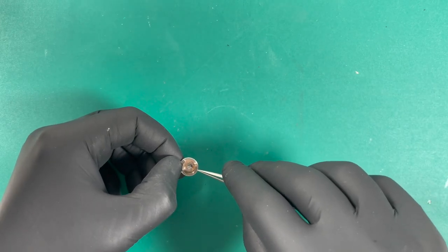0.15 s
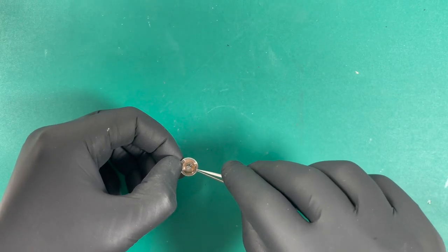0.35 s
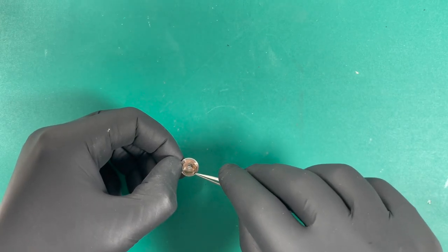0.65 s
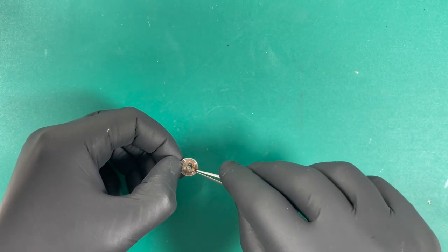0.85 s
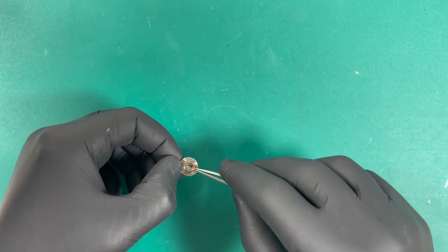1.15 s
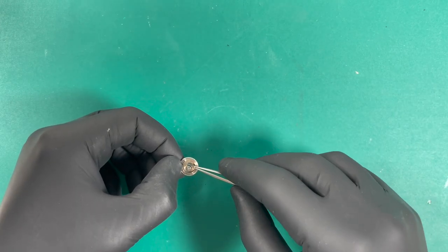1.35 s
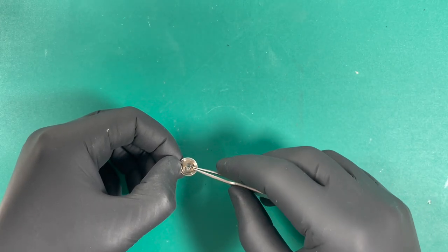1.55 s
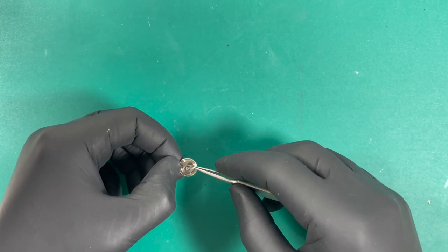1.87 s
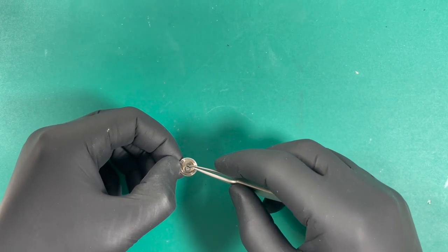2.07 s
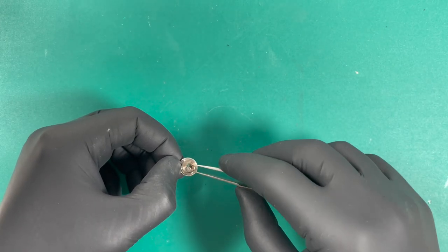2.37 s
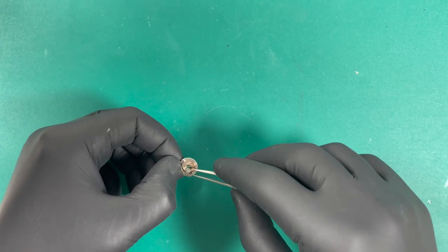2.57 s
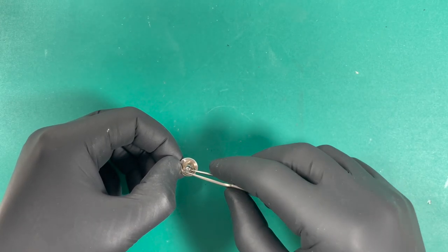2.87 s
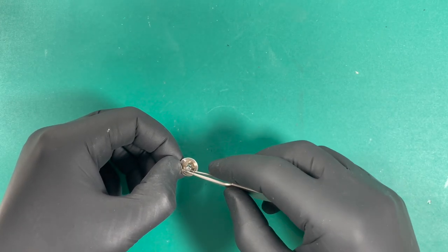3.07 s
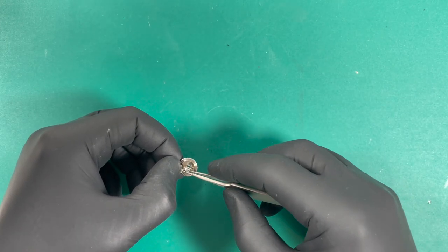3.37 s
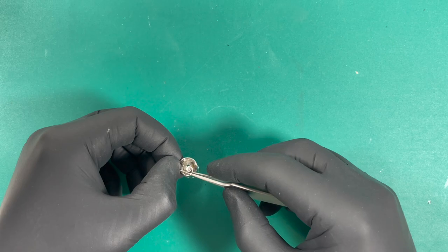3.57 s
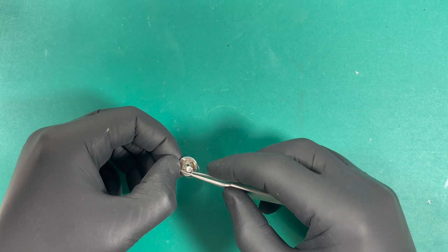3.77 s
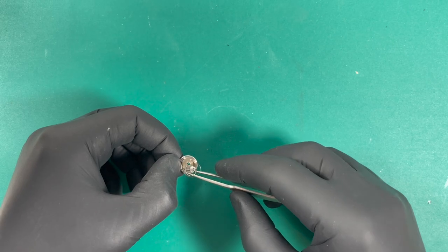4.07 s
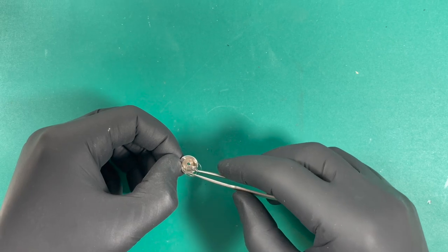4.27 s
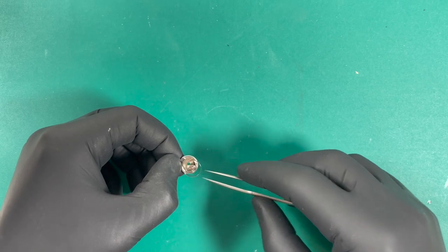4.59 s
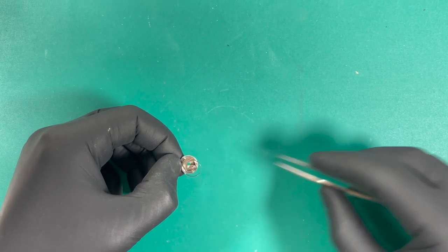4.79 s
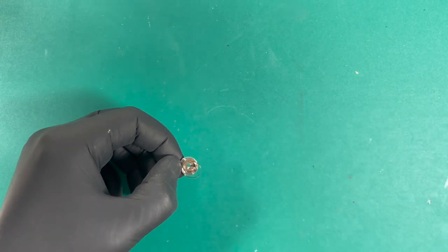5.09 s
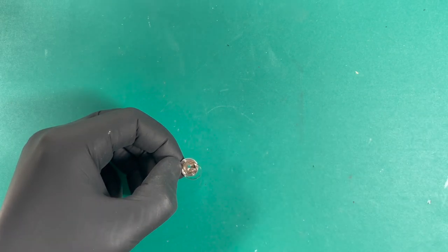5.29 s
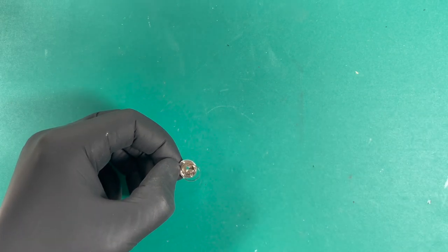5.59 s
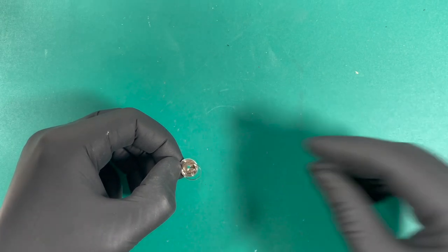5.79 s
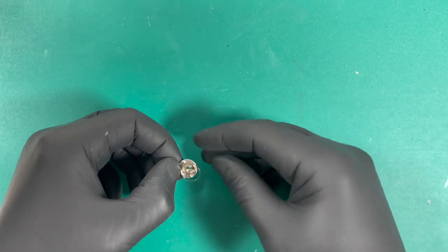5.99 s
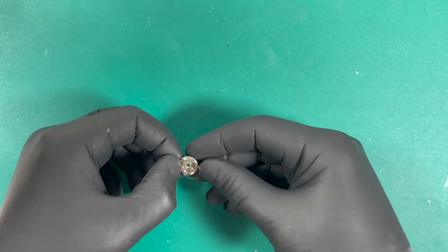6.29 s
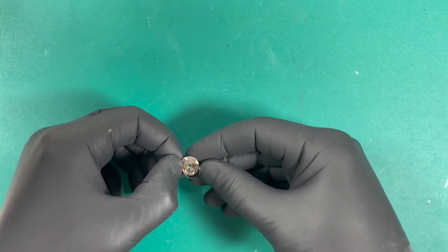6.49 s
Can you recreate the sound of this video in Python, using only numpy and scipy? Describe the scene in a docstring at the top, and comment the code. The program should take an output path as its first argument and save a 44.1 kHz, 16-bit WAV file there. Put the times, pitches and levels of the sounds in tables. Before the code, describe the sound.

In a quiet indoor room with low ventilation rumble and hum, steel tweezer tips tick and scratch on a tiny metal part close to the microphone. The bright clicks are small and irregular, with two sharper slips and faint squeaks between. Then the tweezers drop on the bench to one side, far louder, bounce and rattle briefly. A glove returns with a faint rustle, a dull tap and a tiny squeak.

```python
"""Tweezers on a tiny metal part

Steel tweezers tick and scrape on a part held over a workbench, then drop on the bench to one side and rattle;
a glove comes back with a rustle and a dull tap. Contacts ring decaying modes, drags are dense random catches;
squeaks, soft rubs and short noisy rings after two hard slips are noise bands. Rumble, hum and hiss lie beneath.
Two microphone ports hear everything with a phase gap that grows towards the treble."""
import sys
import numpy as np
from scipy import signal
from scipy.fft import rfft, irfft
from scipy.io import wavfile
from scipy.ndimage import uniform_filter1d

SR = 44100
rng = np.random.default_rng(int(sys.argv[2]) if len(sys.argv) > 2 else 0)


def boost(x):
    """Linear amplitude factor 10**(x/20) for a level x in decibels (scalar or array-like)."""
    u = np.asarray(x, float) / 20
    return 10 ** u


def dump_mix(stems):
    """Bounce the given channels to the path in sys.argv[1] as a 16-bit WAV at rate SR."""
    frames = np.atleast_2d(stems).T  # one column per channel
    limited = np.clip(frames, -1, 1)  # hard clip at full scale
    pcm = np.round(limited * 32767).astype(np.int16)
    wavfile.write(sys.argv[1], SR, pcm)


N = 293265

# Ring modes of tips and part. Each row: frequency in Hz, onset level in dB before tilt, t60 in seconds.
TIPS = [(295, -3, .012), (488, -8, 0.0063), (845, -7, .008), (1400, -1, 0.0063), (1850, -15, 0.014),
        (2520, -13.5, 0.013), (3320, -6.5, 0.0063), (4300, -6.5, 0.0055), (5335, -11, 0.015),
        (6330, 2, 0.0043), (7450, -0.5, 0.008), (8640, 12.5, 0.0028), (10500, -19, 0.0061),
        (10700, -3.5, 0.0073), (11570, -4.5, 0.0036), (12340, -4, .005), (13330, 4, 0.0054),
        (14400, -11, 0.0042), (15500, -11.5, 0.0033)]
# Ring modes of the whole tweezers. Each row: frequency in Hz, onset level in dB before tilt, t60 in seconds.
BODY = [(69.8, -3.5, 0.067), (116, -9.5, 0.034), (293.8, -8.5, 0.012), (500, -8.5, 0.009), (800, -6, 0.016),
        (1450, -9.5, 0.03), (1920, -9.5, 0.0061), (2100, -4.5, 0.015), (2420, -9.5, 0.016),
        (2720, -10.5, .015), (3300, -9, 0.016), (4020, -3.5, .01), (5200, 2.5, 0.0077), (5800, -4, .01),
        (6840, -5, 0.013), (7470, -18, 0.17), (8340, 8, .006), (10000, -6.5, 0.0034), (10940, -15.5, 0.13),
        (12480, 2, .004), (14100, -1.5, .004), (14760, -8.5, 0.05)]


def evened(x):
    """Scales to rms 1."""
    return x / np.sqrt(np.mean(x ** 2) + 1e-30)


def read(points, hz):
    """Interpolates (Hz, value) points on a log frequency axis."""
    f, value = np.transpose(points)
    return np.interp(np.log(hz + 1), np.log(f + 1), value)


def add(mix, start_s, sound):
    """Mixes a sound in at a time."""
    part = mix[round(start_s * SR):][:len(sound)]
    part += sound[:len(part)]


def shaped(x, response):
    """Multiplies the spectrum of x by response(hz)."""
    size = x.shape[-1]
    return irfft(rfft(x) * response(np.fft.rfftfreq(size, 1 / SR)), size)


def lean(x, points):
    """Splits a left-minus-right level difference in dB between the two ports."""
    return shaped(x, lambda hz: boost(read(points, hz) * np.array([[.5], [-.5]])))


def modes(table, hz, spread_db=0):
    """Summed response of decaying modes: one complex pole each, its width set by t60."""
    f, db, t60 = np.transpose(table)[:, :, None]
    pole = 1j * (hz - f) + np.log(1000) / (2 * np.pi * t60)
    return (boost(db + spread_db) / pole).sum(0)


def fuzzy(hz, width_hz):
    """Narrow-band noise that follows the curve hz: slow complex noise turns a carrier; rms 1."""
    r = np.exp(-np.pi * width_hz / SR)
    slow = rng.standard_normal(len(hz)) + 1j * rng.standard_normal(len(hz))
    slow = signal.lfilter([1], np.convolve([1, -r], [1, -r]), slow)
    carrier = np.exp(2j * np.pi * np.cumsum(hz) / SR)
    return evened((slow * carrier).real)


def grit(per_s, spread_db):
    """Random small contacts of uneven size and random sign."""
    size = boost(spread_db * np.minimum(rng.exponential(1, N), 4)) * rng.choice([-1, 1], N)
    return size * (rng.random(N) < per_s / SR)


def blow(mix, s, peak_db, chatter_ms, body, tilt, crack_db, vary_db):
    """A short chatter of contacts rings the modes over a flat crack, tilted by where it lands."""
    chance = rng.standard_normal(8192)
    spread_db = vary_db * rng.standard_normal((len(body), 1))
    t = np.arange(8192) / SR
    press = np.exp(-(1000 * t / max(chatter_ms, .3)) ** 2)
    spectrum = rfft(chance * press)
    contacts = press * irfft(spectrum / abs(spectrum))  # hard contacts push all pitches about alike
    ring = shaped(contacts, lambda hz: boost(read(tilt, hz)) * (modes(body, hz, spread_db) + boost(crack_db)))
    loudest = np.sqrt(2 * uniform_filter1d(ring ** 2, 60).max())
    add(mix, s - .0005, boost(peak_db) * ring[:6000] / loudest)


def ticks():
    """The tips slip off edges of the part; each contact leaves one lower ring sounding longer."""
    # Each row: moment in seconds, peak in dB, 6 kHz and 2.8 kHz in dB re the top ring, favoured ring in Hz.
    slips = [(0.3949, -49.5, -13.5, -28, 5500), (0.6549, -56.5, -29, -31, 1940),
             (0.676, -58, -25, -27, 2040), (0.726, -58, -24, -33, 6400), (0.7436, -48.5, -15, -27, 4040),
             (0.791, -38, -22.5, -21, 4300), (1.1075, -49.5, -15, -26, 5110), (1.1947, -58, -42, -19, 1710),
             (1.248, -53.5, -19, -26, 4240), (1.269, -59, -8, -20, 6600), (1.315, -53, -16, -17.5, 3620),
             (1.416, -54, -17, -15, 1690), (1.43, -54.5, -14, -17.5, 2330), (1.5356, -64, -14, -20, 1720),
             (1.6313, -64, -7, -26, 1880), (1.8535, -36, -15.5, -10.5, 7560), (2.085, -53, -30, -20, 2040),
             (2.1026, -55, -15, -7.5, 7340), (2.1834, -59.5, -8, -28, 8000),
             (2.3199, -38.5, -20, -20, 5360), (2.511, -38, -44, -52, 7800), (2.5483, -46, -16, -13.5, 4300),
             (2.664, -57, -18, -21, 6760), (2.7028, -60, -13, -20, 4340), (2.7215, -58.5, -15, -12, 4400),
             (2.8416, -34, -9.5, -16.5, 7300), (2.9114, -58.5, -13, -10, 5870),
             (2.9748, -49, -6.5, -11.5, 6200), (3.091, -50.5, -19.5, -11.5, 6000),
             (3.2073, -50.5, -20.5, -12, 6300), (3.284, -66, -16, -13, 2360),
             (3.4334, -55, -12.5, -9.5, 7400), (3.51, -59.5, -27, -28, 7630), (3.5633, -55, -7, -5, 5900),
             (3.5921, -23, -12.5, -10.5, 7570), (3.5965, -32, -36, -14, 7900), (3.7923, -62, -16, -7, 3350),
             (3.874, -47.5, -17.5, -7.5, 3240), (3.976, -59.5, -16, -15, 6040),
             (4.039, -40, -9, -13.5, 3270), (4.1508, -44.5, -9.5, -10.5, 6100), (4.174, -64, -4, -22, 5800),
             (4.323, -63, -22, -28, 1800), (4.364, -40, -21, -19, 6170), (4.368, -31, -14.5, -18, 7500),
             (4.373, -33.5, -17, -17.5, 1850), (4.3779, -40, -14, -13.5, 7200),
             (4.4202, -58.5, -11, -1, 6300), (4.4544, -56.5, -18, -20, 6190), (4.5295, -60, -40, -39, 2220),
             (4.5426, -35.5, -25, -28, 6350), (4.559, -51, -15, -26, 6130), (4.5745, -53, -16, -13, 5800),
             (4.5967, -55.5, -7, -23, 7530), (4.9713, -63.5, 6, -39, 5420), (5.238, -67.5, -25, -22, 1700)]
    out = np.zeros(N)
    for s, peak_db, mid_db, low_db, ping_hz in slips:
        knock_db = low_db - 23.0 + 1.46 * (peak_db + 42)  # only hard slips knock through to the bench
        tilt = [(120, knock_db - 20), (450, knock_db), (1150, low_db - 24.5), (1900, low_db - 1.5),
                (2800, low_db), (6000, mid_db), (10000, -5.5), (13000, 1.0)]
        chatter_ms = 2.9 if peak_db > -30 else 3.97  # the hardest slips are shorter
        blow(out, s, peak_db, chatter_ms, TIPS + [(ping_hz, -1, .018)], tilt, crack_db=-59.5, vary_db=4.0)
    return out


def scrape():
    """Tiny catches while the tips drag, in clumps, with a few sharper snags; each drag builds up and lets go."""
    # Each row: firmest moment in seconds, nominal level in dB, build-up in seconds, let-go in seconds.
    drags = [(0.8, -88, .2, 0.28), (1.07, -74, 0.12, .1), (1.26, -81, 0.13, .35), (2.08, -86, 0.25, .15),
             (2.26, -80, .1, .15), (2.45, -78, .08, .08), (2.78, -83, 0.32, .3), (3.68, -89, .2, .15),
             (4.02, -77.5, .3, 0.17), (4.3, -85, 0.065, .08), (4.5, -73.5, .2, .14), (5.12, -95, 0.23, .2)]
    # Each row: frequency in Hz, density in dB per Hz.
    scrape_tone = [(1500, -51), (3500, -28.5), (6000, -17), (9000, -14), (12000, -2.5), (13800, 0),
                   (15500, -8.5)]
    rest_db = -101  # each drag rises from and sinks to this level

    def tone(hz):
        return boost(read(scrape_tone, hz))

    catches = evened(shaped(grit(2500, 2.6), tone))
    snags = evened(shaped(grit(25, 3.0), lambda hz: tone(hz) * modes(TIPS, hz)))
    clumps = evened(uniform_filter1d(rng.standard_normal(N), 500))
    t = np.arange(N) / SR
    presses_db = [np.interp(t, [s - rise_s, s, s + fall_s], [rest_db, db, rest_db])
                  for s, db, rise_s, fall_s in drags]
    press_db = np.max(presses_db, axis=0)
    return (catches * boost(4.5 * clumps - 2.5) + boost(-6.0) * snags) * boost(press_db)


def drop():
    """The whole tweezers touch down, land and bounce: each blow rings the body and thumps the bench."""
    # Each row: moment in seconds, peak in dB, treble and 5 kHz in dB re body, chatter in ms.
    bounces = [(5.4435, -50, -53.5, -24.5, 7), (5.544, -25.5, -17, -7, 2.3),
               (5.5527, -7.5, -12.5, -10.5, 2.76), (5.5891, -14, -19, -4, 3.5),
               (5.6132, -20, -28, -12.5, 4.05), (5.6312, -25.5, -25, -23, 2.5),
               (5.6428, -38.5, -20, -15, 2.6), (5.6534, -31, -40, -11.5, 3)]
    thump_db = -29.5  # the bench under each blow, re body
    out = np.zeros(N)
    for s, peak_db, treble_db, mid_db, chatter_ms in bounces:
        tilt = [(30, thump_db - 6.0), (150, thump_db), (400, -27), (950, -17), (1450, -6.5), (2000, -3.5),
                (5200, mid_db), (8500, mid_db - 1.5), (10200, treble_db - 4.5), (13000, treble_db)]
        blow(out, s, peak_db, chatter_ms, BODY, tilt, crack_db=-58.5, vary_db=2.0)
    return out


def rattle():
    """The loose arms chatter on the bench between the blows, then settle: dense contacts ring the body."""
    # Each row: frequency in Hz, tilt in dB.
    rattle_tone = [(60, -25), (120, -4), (300, -17), (900, -11), (1450, -6.5), (2100, -10), (3100, -3.5),
                   (5200, -14.5), (7500, -9), (11000, -35), (14000, -35.5), (16000, -45.5)]
    start_s, attack_s, hold_s = 5.556, .007, .105
    level_db, fade_db_per_s = -38, 420
    chatter = shaped(grit(2000, 1.5), lambda hz: boost(read(rattle_tone, hz)) * (modes(BODY, hz) + boost(-37.5)))
    t = np.arange(N) / SR - start_s
    fade_db = fade_db_per_s * np.maximum(t - hold_s, 0)
    return evened(chatter) * np.clip(t / attack_s, 0, 1) * boost(level_db - fade_db)


def glove_tap():
    """A gloved hand taps the bench, damping what it touches: the body modes with t60 capped."""
    damped = [(hz, db, min(t60_s, .008)) for hz, db, t60_s in BODY]
    tilt = [(150, -38), (950, -8.5), (2000, -0.5), (5200, -7), (8500, -16), (13000, -15)]
    out = np.zeros(N)
    blow(out, 6.0383, -48, 2, damped, tilt, crack_db=-32.0, vary_db=0.0)
    return out


def band_sound(out, start_s, length_s, first_hz, last_hz, width_hz, db):
    """One steady or gliding noise band, faded at both ends."""
    hz = np.linspace(first_hz, last_hz, round(length_s * SR))
    add(out, start_s, boost(db) * fuzzy(hz, width_hz) * signal.windows.tukey(len(hz), .6))


def squeaks():
    """Faint narrow whistles; steady ones are thin, gliding ones widen with the glide rate."""
    # Each row: start in seconds, length in seconds, first and last frequency in Hz, level in dB before fades.
    whistles = [(0.846, 0.1, 1954, 1830, -88), (1.457, 0.041, 1970, 1920, -85.5),
                (1.592, 0.07, 1860, 1860, -76), (1.69, 0.065, 1870, 1870, -89),
                (1.777, 0.31, 2410, 1995, -93), (2.039, 0.079, 1900, 2040, -83.5),
                (6.419, 0.1, 1818, 2021, -77.5), (6.542, 0.098, 2270, 2290, -96)]
    out = np.zeros(N)
    for s, length_s, first_hz, last_hz, db in whistles:
        width_hz = 30 + .055 * abs(last_hz - first_hz) / length_s  # adds the pitch covered in 55 ms
        band_sound(out, s, length_s, first_hz, last_hz, width_hz, db)
    return out


def rubs_and_rings():
    """Soft rubs of glove and tips, and short noisy rings after two hard slips: noise bands of fixed pitch."""
    # Each row: start in seconds, length in seconds, centre in Hz, width in Hz, level in dB before fades.
    bands = [(1.245, 0.066, 3900, 600, -89), (2.231, 0.063, 3010, 1780, -74.5),
             (2.848, 0.069, 5630, 1400, -77.5), (3.937, 0.059, 3630, 450, -85),
             (4.092, 0.042, 3320, 350, -84.5), (4.551, 0.055, 5350, 1500, -81),
             (5.449, 0.083, 2100, 800, -73.5), (5.505, 0.06, 2299, 1300, -63),
             (5.921, 0.28, 13400, 2500, -81.5), (5.959, 0.034, 5200, 3495, -75),
             (5.991, 0.076, 3506, 3500, -77.5), (6.106, 0.047, 4800, 2698, -81.5)]
    out = np.zeros(N)
    for s, length_s, hz, width_hz, db in bands:
        band_sound(out, s, length_s, hz, hz, width_hz, db)
    return out


def reflections(x, shared):
    """Sparse taps of random sign, each band dying at its own speed; most fades out early."""
    # Each row: frequency in Hz, t60 in seconds.
    decay = [(300, 0.2), (2000, .17), (8000, .2), (16000, 0.19)]
    heard_s, fade_s, late_db = 0.08, .014, -21.5  # late_db: what lingers after the fade
    taps = np.zeros((3, 14000))
    at = np.arange(100, 13900, 12) + rng.integers(0, 12, (3, 1150))
    np.put_along_axis(taps, at, rng.choice([-1., 1.], at.shape), 1)
    taps = taps[:2] + shared * taps[2]  # some reflections reach both ports alike
    hz, t, z = signal.stft(taps, SR, nperseg=128)
    tail = signal.istft(z * boost(-60 * t / read(decay, hz)[:, None]), SR, nperseg=128)[1]
    early = 1 / (1 + np.exp((np.arange(tail.shape[1]) / SR - heard_s) * 4 / fade_s))
    tail = tail * (early + boost(late_db))
    tail = tail / np.linalg.norm(tail, axis=1, keepdims=True)
    return signal.fftconvolve(x[None], tail, axes=1)[:, :N]


def room_tone():
    """Ventilation rumble, wavering hum lines and a thin hiss, partly shared by both ports."""
    # Each row: frequency in Hz, relative density in dB per Hz.
    rumble_tone = [(13, -62), (22, -33.5), (32, -26), (40, -15), (49, -8.5), (102, 1), (125, -18),
                   (155, -13), (199, -33), (214, -12), (236, -11), (262, -27.5), (294, -31), (700, -48),
                   (910, -71), (1540, -120)]
    # Each row: frequency in Hz, relative density in dB per Hz.
    hiss_tone = [(200, -10.5), (450, -1), (900, -4.5), (1600, -11.5), (3000, -15), (5500, -17.5),
                 (8000, -19.5), (11000, -21.5), (13500, -20.5), (15000, -27.5), (16800, -32)]
    # Each row: frequency in Hz, width in Hz, level in dB.
    hum_lines = [(64, 1.8, -64.5), (99.3, 7, -62.5), (146, 5.7, -74), (235.8, 0.15, -74), (244, 0.8, -84)]
    # Each row: frequency in Hz, left-right likeness from -1 to 1.
    likeness = [(60, 1), (130, 0.98), (200, .9), (290, 0.59), (640, -0.77), (1400, -.3), (2100, 0.14),
                (3100, 0.12), (4800, 0.06), (6000, .93), (7500, 0.018), (9500, 1), (12000, 0.92),
                (15000, 0.73)]
    # Each row: frequency in Hz, left minus right in dB.
    room_lean = [(40, -1.3), (110, -1.5), (200, -4), (400, 0.5), (16000, -0.5)]

    def same(hz):
        return np.clip(read(likeness, hz), -1, 1)

    rumble = evened(shaped(rng.standard_normal((2, N)), lambda hz: boost(read(rumble_tone, hz))))
    hiss = evened(shaped(rng.standard_normal((2, N)), lambda hz: boost(read(hiss_tone, hz))))
    left, other = boost(-59) * rumble + boost(-81) * hiss
    for hz, width_hz, db in hum_lines:
        left = left + boost(db) * fuzzy(np.full(N, float(hz)), width_hz)
    right = shaped(left, same) + shaped(other, lambda hz: np.sqrt(1 - same(hz) ** 2))
    return lean(np.array([left, right]), room_lean)


def scene():
    """Near sounds and the bench to one side, each with reflections, over the room tone."""
    # Bench side. Each row: frequency in Hz, left minus right in dB.
    bench_lean = [(60, 0), (150, -2.5), (380, -3.5), (950, -1), (2380, 1.5), (5980, -1.5), (15000, 1.5)]
    near = ticks() + scrape() + squeaks() + rubs_and_rings()
    side = drop() + rattle() + glove_tap()
    bench = lean(side + boost(-7) * reflections(side, shared=0.7), bench_lean)
    return near + boost(-12.5) * reflections(near, shared=1.2) + bench + room_tone()


def low_pass(x):
    """Removes everything above the highest recorded frequency."""
    return signal.sosfilt(signal.butter(12, 16800, fs=SR, output="sos"), x)


def record(dry):
    """The ports differ in phase, so their sum has a hole near 10 kHz; the top rolls off."""
    # Each row: frequency in Hz, left phase lead in radians.
    port_lead = [(500, -.1), (3500, .6), (5500, .1), (7200, 1.6), (9100, 3), (10500, 3.2), (14800, 6.1),
                 (16400, 6.4)]
    # Top of the microphone. Each row: frequency in Hz, gain in dB.
    mic_top = [(13500, -1), (15000, -3.5), (16000, -9), (16700, -34), (17200, -79)]

    def response(hz):
        turn = np.exp(1j * read(port_lead, hz) * np.array([[.5], [-.5]]))
        return turn * boost(read(mic_top, hz))

    ports = shaped(dry, response)
    return low_pass(ports)


dry = scene()
out = record(dry)
dump_mix(out)
```